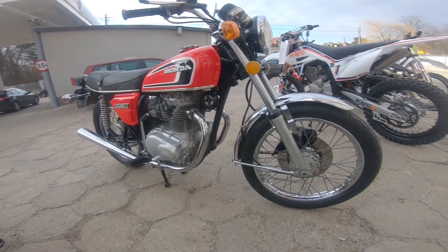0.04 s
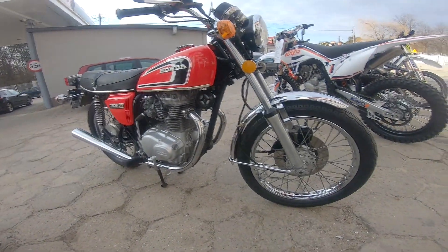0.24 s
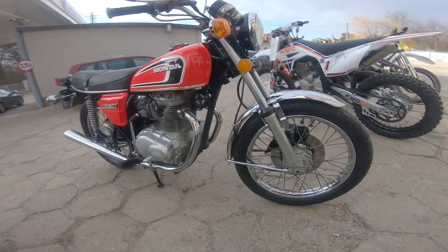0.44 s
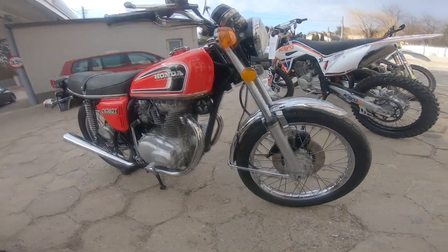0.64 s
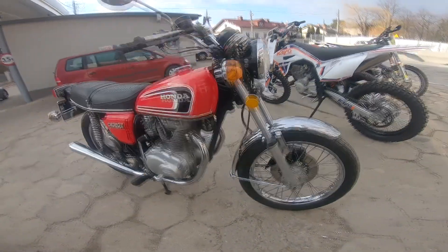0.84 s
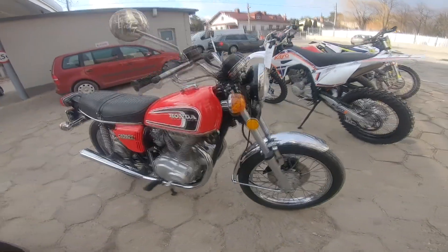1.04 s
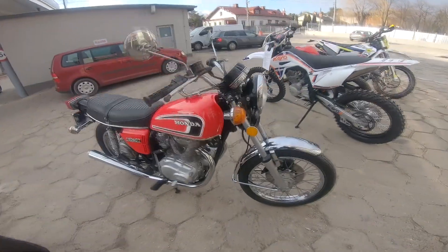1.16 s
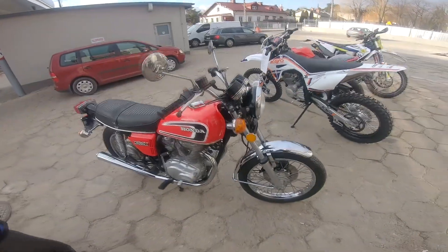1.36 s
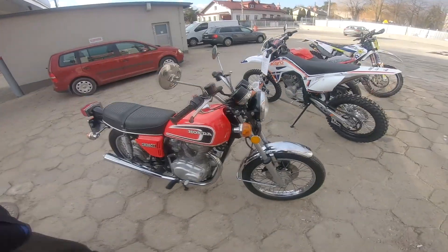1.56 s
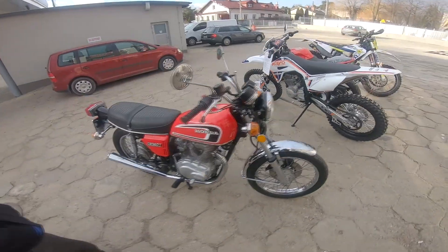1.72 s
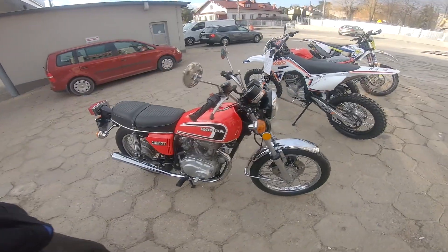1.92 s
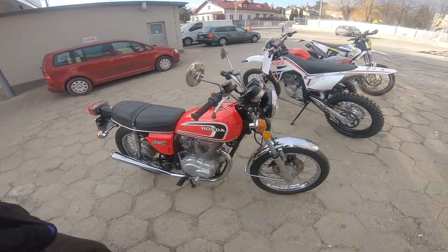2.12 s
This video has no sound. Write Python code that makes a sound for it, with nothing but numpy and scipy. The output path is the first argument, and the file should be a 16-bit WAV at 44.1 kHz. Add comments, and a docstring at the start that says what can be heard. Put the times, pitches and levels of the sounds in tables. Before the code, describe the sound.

A twin-cylinder motorcycle idles outdoors, its low exhaust puffs beating evenly under valve clatter.

```python
"""An air-cooled twin-cylinder motorcycle idles in a paved yard, about 13 beats a second from the start.
Each beat, two exhaust puffs, some weak, set the silencer booming; strong ones crack, and gas rushes after.
Every two beats the knocks and valve clatter repeat, ringing the crankcase and the cooling fins.
In the first 0.6 s the listener steps back and the echo off the paving closes on the direct sound.
The fins fade near 1.4 s, then return; chain and gears whirr on to the end."""
import sys
import numpy as np
from scipy import signal
from scipy.fft import rfft, irfft, next_fast_len
from scipy.io import wavfile
from scipy.ndimage import map_coordinates

SR = 44100
rng = np.random.default_rng(int(sys.argv[2]) if len(sys.argv) > 2 else 0)


def int16_out(signal):
    """Quantize to a 16-bit WAV file."""
    q = np.round(np.clip(np.atleast_2d(signal).T, -1, 1) * 32767)
    wavfile.write(sys.argv[1], SR, q.astype(np.int16))


N = 96446
LEAD = SR // 5   # samples of run-in
T = np.arange(-LEAD, N) / SR
FFT_SIZE = next_fast_len(len(T))
BINS_HZ = np.maximum(np.fft.rfftfreq(FFT_SIZE, 1 / SR), 1)

# one beat per crank turn: t/s, first puff strength, gap/s, second puff strength
BEATS = [(-0.0347, 0.83, 0.02, 0.27), (0.043, 0.08, 0.017, 0.61), (0.1188, 0.62, 0.02, 0.31),
         (0.1955, 0.26, 0.018, 0.63), (0.2723, 0.56, 0.0183, 0.46), (0.3487, 0.68, 0.018, 0.6),
         (0.4219, 0.53, 0.018, 0.37), (0.4968, 0.56, 0.017, 0.38), (0.5707, 0.52, 0.018, 0.41),
         (0.6449, 0.46, 0.018, 0.51), (0.7211, 0.26, 0.021, 0.62), (0.7996, 0.61, 0.019, 0.22),
         (0.878, 0.65, 0.019, 0.58), (0.9541, 0.64, 0.019, 0.15), (1.032, 0.57, 0.018, 0.56),
         (1.1065, 0.68, 0.017, 0.09), (1.1824, 0.6, 0.0186, 0.58), (1.2578, 0.48, 0.018, 0.5),
         (1.3331, 0.55, 0.018, 0.6), (1.4051, 0.46, 0.0175, 0.39), (1.4781, 0.58, 0.0176, 0.44),
         (1.5498, 0.37, 0.018, 0.28), (1.6259, 0.55, 0.018, 0.57), (1.6985, 0.32, 0.019, 0.35),
         (1.7761, 0.49, 0.018, 0.53), (1.8484, 0.43, 0.018, 0.24), (1.9235, 0.44, 0.019, 0.54),
         (1.999, 0.0, 0.017, 0.43), (2.076, 0.51, 0.018, 0.58), (2.1502, 0.56, 0.017, 0.25)]
# silencer resonances: f/Hz, width/Hz, signed gain
SILENCER_MODES = [(85, 22.3, -0.48), (108.46, 6.35, -0.24), (135.5, 21.2, 0.49), (185.4, 12, 0.071),
                  (219.3, 12.1, 0.053), (266.8, 17.2, 0.1156), (293.7, 39, -0.041)]
# swell of the silencer overtones: t/s, gain/dB
OVERTONE_SWELL = [(0, -1), (.25, -0.5), (.45, 2.5), (.65, 2.5), (.82, -3.5), (1.1, -1.5), (2.18, -1)]
# cracks of strong puffs: t/s, relative level/dB
CRACKS = [(0.219, -23), (0.37, -30.5), (0.516, -23.5), (0.592, -24.5), (0.667, -25.5), (0.745, -29),
          (0.9, -23.5), (1.052, -22), (1.205, -23), (1.354, -22), (1.499, -25), (1.646, -27.5),
          (1.796, -31), (1.927, -24.5)]
# pipe resonances: f/Hz, width/Hz, signed gain
PIPE_MODES = [(385, 41, 0.18), (580, 29, 0.17), (693, 290, 0.84), (785, 37, 0.13), (1110, 280, 0.078),
              (1910, 73, 0.56)]
# gas noise: f/Hz, relative density/dB
RUSH_SPECTRUM = [(40, -19), (70, -22), (150, 3), (200, -1), (275, 3.5), (340, -12.5), (560, -5),
                 (1000, -13), (1400, -18.5), (3000, -34)]
# crankcase knocks: phase/cycle (two turns), relative level/dB
KNOCKS = [(.03, -16), (0.34, -3), (.455, -13), (0.529, -8), (.842, -4.5), (0.96, -6)]
# crankcase resonances: f/Hz, width/Hz, signed gain
CASE_MODES = [(807, 69, 0.22), (946, 48, -0.44), (1102, 37, 0.51), (1232, 17.5, -0.11), (1495, 48, 0.26),
              (1918, 104, -0.5), (2030, 41, 0.31)]
# valve clatter bursts: phase/cycle, width/cycle, relative level/dB
CLATTER_BURSTS = [(.015, 0.061, -4), (0.138, 0.032, -1), (0.271, 0.02, 2.5), (0.532, 0.1, -5),
                  (0.667, 0.015, -1), (0.777, 0.014, 2.5)]
# edges of the independent clatter bands: f/Hz
CLATTER_EDGES_HZ = [600, 2500, 4600, 6700, 9200, 15000]
# clatter colour: f/Hz, relative density/dB
CLATTER_SPECTRUM = [(700, -39), (1500, -0.5), (2400, 4.5), (4500, -0.5), (6200, -1), (6900, -3), (7800, 5),
                    (9400, -5.5), (10600, -2), (11300, -35.5), (13800, -19)]
# cooling fin resonances: f/Hz, width/Hz, relative level/dB
FIN_MODES = [(1928, 20, -11), (1980, 60, -17), (5080, 33, 2.5), (5755, 74, 8), (6180, 80, -2),
             (6330, 95, -1.5), (7140, 23, -4), (7580, 38, -10.5), (8520, 35, -9.5), (8950, 51, -6.5),
             (9970, 190, -6), (10620, 44, -6.5), (12200, 60, -11)]
# fin ring at the moving listener: t/s, level/dB
FIN_LEVELS = [(0, -40), (.45, -37.5), (.7, -41), (.92, -38), (1.2, -42), (1.4, -45.5), (2.18, -39)]
# chain and gear noise: f/Hz, relative density/dB
WHIRR_SPECTRUM = [(20, -8), (40, 6), (120, 11.5), (280, 9), (360, 6), (600, 1.5), (1050, -4), (1350, -2),
                  (2000, -11), (2400, -9.5), (4200, -7.5), (6300, -13.5), (8000, -12.5), (10600, -14),
                  (11400, -24.5), (13800, -33)]
# stereo width of the engine noise: f/Hz, left-right correlation
CORRELATION = [(100, 0.96), (300, 0.94), (600, 0.86), (1200, 0), (3000, 0.36), (5700, 0.39), (9000, 0),
               (13000, 0)]
# stereo balance of the engine noise: f/Hz, left minus right/dB
BALANCE = [(100, 2.2), (1200, -1.5), (3000, 0.5), (5700, -4.5), (9000, -5), (13000, -16)]
# echo off the paving: t/s, delay/s
PAVING_DELAYS = [(0, 0.0016), (.6, 0.0012), (1.2, 0.00128), (2.18, 0.0013)]


def boom(gain_db=0.1, top_hz=1450):
    """Puffs ring the silencer: three deep modes, plus overtones that swell and fade."""
    drive = from_db(gain_db) * smooth(puffs(), 1 / (2 * np.pi * top_hz))
    overtones = from_db(over_time(OVERTONE_SWELL)) * resonate(drive, SILENCER_MODES[3:])
    return resonate(drive, SILENCER_MODES[:3]) + overtones


def puffs(first_db=0):
    """Two exhaust pulses per beat, as clicks."""
    times_s, first, gap_s, second = np.transpose(BEATS)
    return from_db(first_db) * clicks(times_s, first) + clicks(times_s + gap_s, second)


def crack(delay_s=0.00249, gain_db=4.5):
    """Strong puffs steepen into a short crack in the pipe."""
    times_s, levels_db = np.transpose(CRACKS)
    return pipe(clicks(times_s + delay_s, from_db(levels_db + gain_db)))


def pipe(x, band_hz=(410, 970)):
    """Midrange resonance of the exhaust pipe."""
    return resonate(butter(x, 1, band_hz, "band"), PIPE_MODES)


def rush(rush_db=-36.5, bark_db=-46, rise_s=0.0035, fall_s=0.031):
    """Turbulent gas follows each puff: a dull rush, and a bark in the pipe."""
    flow = unit_rms(smooth(smooth(puffs(first_db=1), rise_s), fall_s))
    bark = unit_rms(pipe(flow * rng.standard_normal(len(T))))
    return from_db(rush_db) * flow * coloured(white_pair(), RUSH_SPECTRUM) + from_db(bark_db) * bark


def knocks(gain_db=-31.5, spread_db=6, jitter_s=0.000703):
    """Knocks at set points of the cycle strike each crankcase mode with random strength."""
    times_s = np.concatenate([cycle_times(phase) for phase, _ in KNOCKS])
    times_s += jitter_s * rng.standard_normal(len(times_s))
    levels_db = gain_db + np.repeat([db for _, db in KNOCKS], len(BEATS) // 2)
    out = 0
    for hz, width_hz, gain in CASE_MODES:
        strengths = from_db(levels_db + spread_db * rng.standard_normal(len(times_s)))
        out += gain * ring(clicks(times_s, strengths), hz, width_hz)
    return out


def valve_gear(clatter_db=-42, steady_shake_db=2):
    """Rockers and chain rattle; the impacts and a steady shake ring the fins."""
    impacts = sum(rattle(band_hz) for band_hz in zip(CLATTER_EDGES_HZ, CLATTER_EDGES_HZ[1:]))
    shaking = impacts + from_db(steady_shake_db) * white_pair()
    fins = sum(from_db(db) * unit_rms(ring(shaking, hz, width_hz)) for hz, width_hz, db in FIN_MODES)
    fins = unit_rms(stereo(fins, correlation=0.58, balance_db=-4)) * from_db(over_time(FIN_LEVELS))
    return from_db(clatter_db) * coloured(impacts, CLATTER_SPECTRUM) + fins


def rattle(band_hz, impacts_per_s=5000, burst_spread_db=5.5, impact_spread_db=2.2):
    """Tiny impacts in one band, swelling in uneven bursts at set points of the cycle."""
    cycle_s = 2 * np.mean(np.diff(np.array(BEATS)[:, 0]))
    power = 1e-9
    for phase, width, db in CLATTER_BURSTS:
        times_s = cycle_times(phase)
        peaks = from_db(db + burst_spread_db * rng.uniform(-0.82, 1, len(times_s)))
        bell = np.exp(-0.5 * (np.arange(-LEAD, LEAD) / (SR * width * cycle_s)) ** 2)
        power += signal.fftconvolve(clicks(times_s, peaks ** 2), bell, "same")
    sizes = from_db(impact_spread_db * np.minimum(rng.exponential(1, len(T)), 4))
    impacts = white_pair() * sizes * (rng.random(len(T)) < impacts_per_s / SR)
    bursts = unit_rms(impacts * np.sqrt(np.abs(power)))
    return butter(bursts, 3, band_hz, "band")


def whirr(whirr_db=-34, drone_db=-43.5, flutter_db=0.5):
    """Chain and gears run on with slight flutter and keep the crankcase droning."""
    flutter = from_db(flutter_db * unit_rms(smooth(rng.standard_normal(len(T)), lag_s=0.0029)))
    drone = unit_rms(stereo(resonate(white_pair(), CASE_MODES), correlation=0.39, balance_db=-5))
    gears = coloured(white_pair(), WHIRR_SPECTRUM)
    return flutter * (from_db(whirr_db) * gears + from_db(drone_db) * drone)


def paving(x, echo_db=-16.5):
    """Direct sound plus ground echo; the delay shifts as the listener steps back."""
    read_at = (T - over_time(PAVING_DELAYS)) * SR + LEAD
    echo = np.array([map_coordinates(side, [read_at], order=3) for side in x])
    return x + from_db(echo_db) * echo


def yard(x, gain_db=-1, decay_s=0.019, band_hz=(404, 4000)):
    """Short scatter off paving, wall and parked vehicles, different at each ear."""
    t = np.arange(LEAD) / SR
    scatter = rng.standard_normal((2, LEAD)) * np.exp(-t / decay_s)
    scatter /= np.sqrt(np.sum(scatter ** 2, axis=1, keepdims=True))
    midrange = butter(x, 2, band_hz, "band")
    return from_db(gain_db) * signal.fftconvolve(midrange[None], scatter, axes=1)[:, :len(T)]


def cycle_times(phase):
    """Times/s at which the engine passes one phase of its two-turn cycle."""
    starts_s = np.array(BEATS)[:, 0]
    starts_s = np.append(starts_s, 2 * starts_s[-1] - starts_s[-2])
    turns = np.arange(0, len(BEATS), 2) + 2 * phase
    return np.interp(turns, np.arange(len(starts_s)), starts_s)


def clicks(times_s, sizes):
    """Impulses, each split between its two nearest samples."""
    at = np.clip(times_s * SR + LEAD, 0, len(T))
    out = np.zeros(len(T) + 2)
    np.add.at(out, at.astype(int), sizes * (1 - at % 1))
    np.add.at(out, at.astype(int) + 1, sizes * (at % 1))
    return out[:len(T)]


def ring(x, hz, width_hz):
    """One mode: a unit click starts a decaying unit cosine."""
    r, c = np.exp(-np.pi * width_hz / SR), np.cos(2 * np.pi * hz / SR)
    return signal.lfilter([1, -r * c], [1, -2 * r * c, r * r], x + 1e-18)


def resonate(x, modes):
    """Modes in parallel."""
    return sum(gain * ring(x, hz, width_hz) for hz, width_hz, gain in modes)


def stereo(pair, correlation, balance_db):
    """Mix two independent signals to left and right."""
    mid, side = np.sqrt(1 + correlation) * pair[0], np.sqrt(1 - correlation) * pair[1]
    return np.array([(mid + side) * from_db(balance_db / 2), (mid - side) * from_db(-balance_db / 2)])


def coloured(pair, spectrum):
    """Give a noise pair a spectrum and the engine's stereo image; rms 1."""
    bins = stereo(rfft(pair, FFT_SIZE), over_frequency(CORRELATION), over_frequency(BALANCE))
    bins *= from_db(over_frequency(spectrum))
    return unit_rms(irfft(bins, FFT_SIZE)[:, :len(T)])


def over_frequency(table):
    """Interpolate on log frequency."""
    hz, values = np.transpose(table)
    return np.interp(np.log(BINS_HZ), np.log(hz), values)


def over_time(table):
    """Interpolate at each sample."""
    return np.interp(T, *np.transpose(table))


def smooth(x, lag_s):
    """One-pole low-pass."""
    r = np.exp(-1 / (lag_s * SR))
    return signal.lfilter([1 - r], [1, -r], x + 1e-18)


def butter(x, order, hz, kind):
    """Causal, maximally flat filter."""
    return signal.sosfilt(signal.butter(order, hz, kind, fs=SR, output="sos"), x)


def white_pair():
    """Two independent white noises."""
    return rng.standard_normal((2, len(T)))


def unit_rms(x):
    """Scale to rms 1."""
    return x / np.sqrt(np.mean(x ** 2) + 1e-20)


def from_db(db):
    """Decibels to gain."""
    return 10 ** (np.asarray(db) / 20)


def scene():
    """Exhaust and mechanism in the yard; boom, cracks and knocks slightly right."""
    hits = crack() + knocks()
    direct = (boom() + hits) * from_db([[-0.2], [0.2]])
    mix = direct + yard(hits) + rush() + paving(valve_gear() + whirr())
    return mix[:, LEAD:]


def record(dry, low_hz=16, top_hz=14100):
    """Gentle sub-bass cut, steep top cut."""
    lean = butter(dry, 1, low_hz, "high")
    return signal.sosfilt(signal.ellip(10, 0.2, 80, top_hz, fs=SR, output="sos"), lean)


dry = scene()
out = record(dry)
int16_out(out)
```